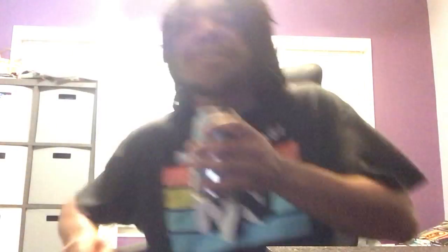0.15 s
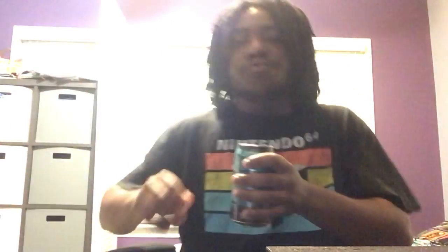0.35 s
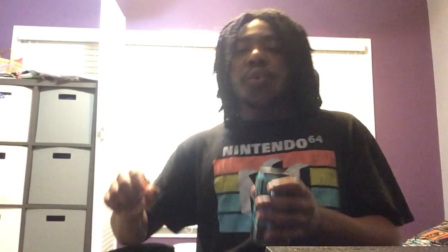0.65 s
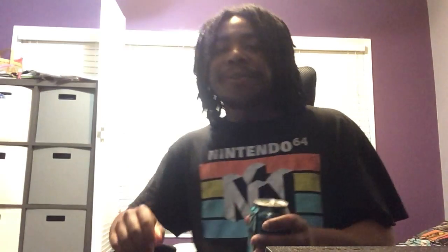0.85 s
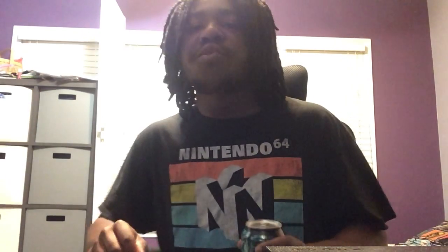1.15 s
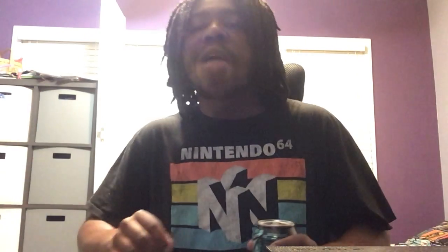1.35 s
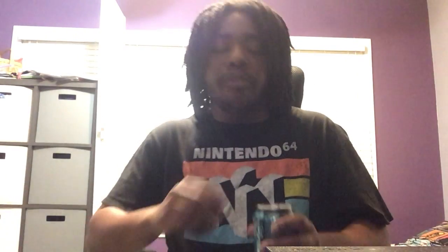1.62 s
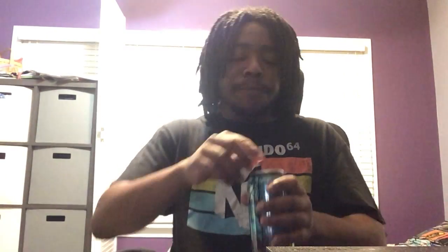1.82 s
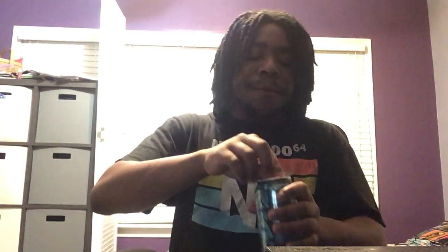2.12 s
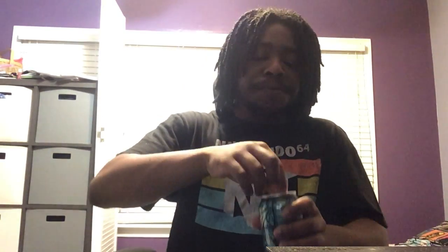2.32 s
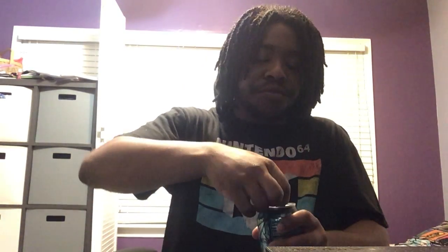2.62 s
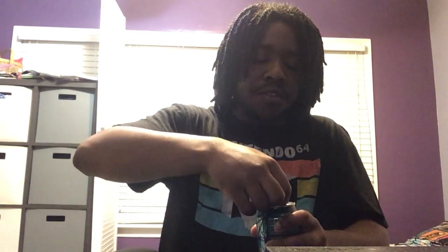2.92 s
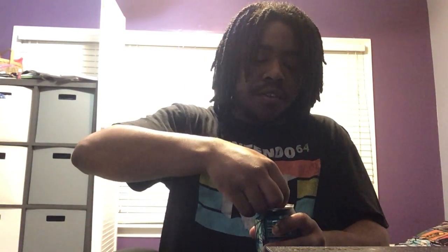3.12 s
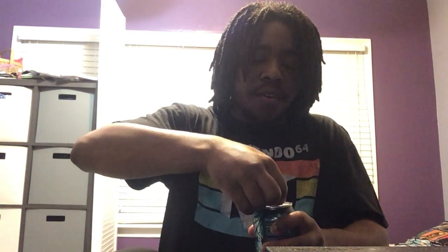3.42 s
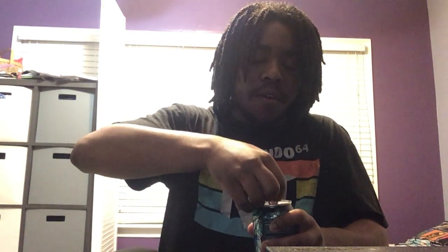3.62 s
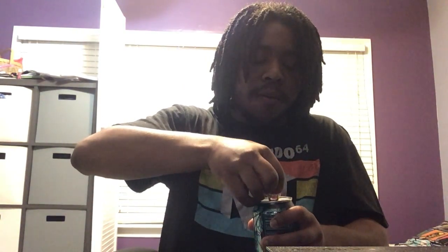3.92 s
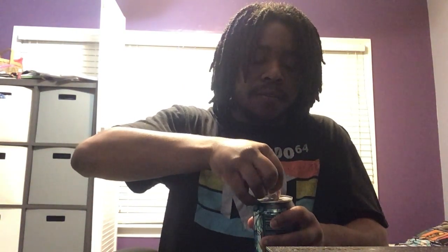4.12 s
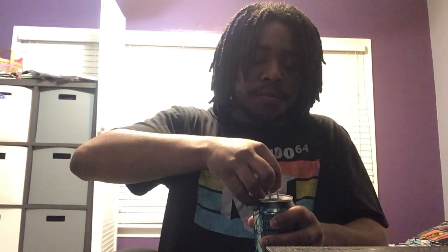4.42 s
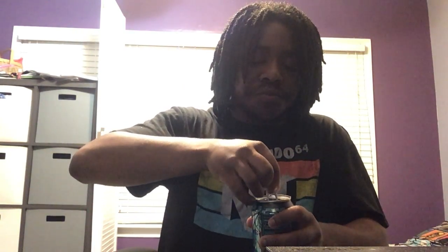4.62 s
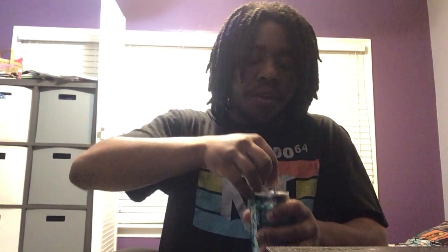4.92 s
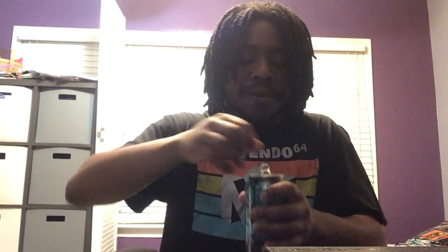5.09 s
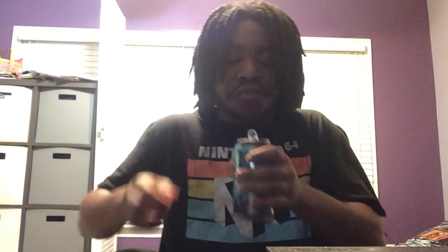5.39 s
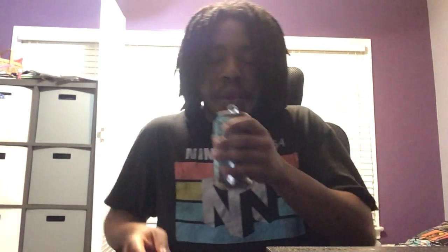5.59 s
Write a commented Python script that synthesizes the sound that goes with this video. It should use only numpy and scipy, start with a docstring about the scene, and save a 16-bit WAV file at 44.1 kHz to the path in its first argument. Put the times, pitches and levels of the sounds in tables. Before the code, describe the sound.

Soft chair thuds and finger ticks, a short gas hiss with metallic pops, then a loud can-tab crack in a small whirring room.

```python
"""A small room: someone sits down at a desk and slowly opens an aluminium drink can near a laptop microphone.
Soft bumps and finger ticks come first, made from struck bursts of coloured noise.
The seal cracks and a jet of coloured noise hisses out; the lid buckles in bright pops of ringing modes.
The score tears in ticks, then the flap snaps in with a crack, a rattling can and a pulse of air.
A fan of noise and wavering tones whirs throughout; the recorder's gain control ducks it after the snap."""
import sys
import numpy as np
from scipy import signal
from scipy.fft import rfft, irfft
from scipy.io import wavfile
from scipy.ndimage import uniform_filter1d, minimum_filter1d

SR = 44100
rng = np.random.default_rng(int(sys.argv[2]) if len(sys.argv) > 2 else 0)


def output_pcm(signal):
    """Save a mono or channel-first signal as 16-bit PCM at the path in sys.argv[1].

    Samples are clipped to [-1, 1] before scaling.
    """
    pcm = np.clip(np.atleast_2d(signal).T, -1, 1) * 32767
    wavfile.write(sys.argv[1], SR, np.round(pcm).astype(np.int16))


N = 253591
T = np.arange(N) / SR
RING = T[:8192]  # time axis of one hit or one filter

# fan air: f/Hz, level/dB
AIR_COLOUR = [(15, -58), (25, -26.5), (42, -8.5), (92, -5.5), (288, -6.5), (376, -0.5), (501, -2.5),
              (643, -5.5), (694, -6), (824, -13.5), (1120, -17.5), (1460, -9.5), (1800, -16), (1950, -15),
              (2400, -23), (3120, -43), (5280, -120)]
# microphone hiss: f/Hz, level/dB
HISS_COLOUR = [(1180, -31), (2000, -0.5), (2240, -15), (2590, -4), (4920, -13.5), (7510, -12.5),
               (7710, -10.5), (9990, -8.5), (14700, -11), (15800, -19.5)]
# fan tones and electrical whine: f/Hz, level/dB
FAN_TONES = [(712, -69.5), (1424, -67), (1663, -74), (1900, -71.5), (7962, -77), (9238, -81.5),
             (10150, -84.5)]
# how long the room rings: f/Hz, t60/s
ROOM_DECAY = [(150, 0.4), (600, 0.44), (1400, 0.19), (4500, 0.22), (14000, 0.2)]
# colour of the room's tail: f/Hz, level/dB
ROOM_COLOUR = [(100, -4), (600, -3.5), (1500, -2), (4000, -2), (8000, -2), (15000, -4.5)]
# colour of the bounce off the near wall: f/Hz, level/dB
BOUNCE_COLOUR = [(1000, -4), (5000, -6), (8000, 3), (11000, 5.0), (15000, 6.5)]
# soft bumps of body, chair and desk: t/s, level/dB, knock against thud/dB, time until the weight settles/s
BUMPS = [(0.07, -29.5, -4, .03), (0.238, -45.5, 3.5, 0.0099), (0.293, -42, -10, 0.0045),
         (0.799, -43.5, -21, .012), (0.924, -48, -14, 0.00386), (1.741, -34, -7.5, .014),
         (1.829, -45, -22, 0.0087)]
# colour of a padded thud: f/Hz, level/dB
THUD_COLOUR = [(50, -26), (100, -7), (165, 4), (340, 2.5), (600, -10.5), (1200, -23), (3000, -50)]
# colour of its wooden knock: f/Hz, level/dB
KNOCK_COLOUR = [(300, -13), (700, 2), (950, 0), (1250, 2.5), (1800, -5), (3000, -18.5), (9000, -29)]
# fingers tick on the can: t/s, peak level/dB, centre f/Hz
FINGER_TICKS = [(0.161, -45.5, 3770), (0.2368, -44, 3870), (0.5365, -47.5, 2610), (0.84, -41.5, 12800),
                (0.8834, -47.5, 2820), (1.2905, -45.5, 3760), (1.3078, -44, 3830), (1.3623, -41.5, 7700),
                (1.3799, -43, 2800), (2.1767, -47.5, 3010), (3.472, -48.5, 4580), (4.652, -43, 6300),
                (4.9157, -42.5, 13600), (5.658, -46.5, 4380)]
# the hands shift their grip, with fainter ticks: from t/s, to t/s
GRIP_SHIFTS = [(0.051, 0.3), (4.649, 5.7)]
# colour of the gas jet: f/Hz, level/dB
JET_COLOUR = [(1000, -35.5), (3300, -23.5), (4200, -7.5), (5700, -9), (6600, 1), (8000, -5), (9000, -0.5),
              (11300, -1), (12400, 3), (13500, -1.5), (15600, -5)]
# the lid buckles under the tab: t/s, level/dB, lid pitch f/Hz, upper modes/dB, crack/dB
LID_POPS = [(2.6484, -31, 4250, 3.5, 2), (2.8407, -19, 4050, -10, -4.5), (2.871, -15, 4350, 4.5, -2.5),
            (3.532, -20, 4440, -5.5, -3)]
# the lid's overtones: f/Hz, level/dB, t60/s
LID_MODES = [(4866, -3, 0.013), (5140, -3.5, 0.014), (5430, -2.5, 0.0078), (6440, -6.5, 0.0062),
             (8670, -10, 0.01), (9550, -8, 0.0085), (10570, -5.5, .011), (12400, -10, 0.014),
             (14100, -16, 0.0104)]
# the can's wall under the pops: f/Hz, level/dB, t60/s
WALL_MODES = [(377.7, -9, .015), (800, -5, .015), (1560, -1, 0.012), (1690, 2, .014), (2706, -5, 0.027),
              (2820, -4, .012), (3590, 3.5, 0.013)]
# the score tears a little further: t/s, level/dB
TEARS = [(3.745, -42.5), (3.8769, -49), (3.9455, -54), (4.0102, -30), (4.0587, -28), (4.091, -33)]
# tab and flap ring together: f/Hz, level/dB, t60/s
TAB_MODES = [(820, -18, 0.018), (2752.4, -22, 0.021), (3556, -17.5, 0.024), (3700, -12.5, 0.0235),
             (4650, 0.5, 0.012), (4900, 1.5, 0.0086), (5300, -2.5, 0.014), (6200, -6.5, 0.011),
             (7110, -9.5, 0.0113), (8900, -9, 0.033), (10850, -8, .01), (13700, -17, .008)]
# colour of tearing metal: f/Hz, level/dB
CRACK_COLOUR = [(200, -22.5), (1000, -15), (2200, -4.5), (4000, 1.5), (6500, 6), (8000, -1), (11500, 0.5),
                (14000, -0.5), (15500, -9)]
# the opened can rings: f/Hz, level/dB, t60/s
CAN_MODES = [(670, -8.5, 0.0089), (1223, -2, 0.0196), (2107, -2, .02), (2580, -4.5, 0.024),
             (2790, -6.5, 0.042), (3200, -7, .022), (3670, 3, 0.024), (3850, -2, .018), (4800, 5.5, 0.015),
             (6520, 1.5, .01), (6600, 0.5, .01), (11300, 3.5, 0.00795), (12100, -1, 0.0102)]
# the thin wall's countless close modes, as a colour: f/Hz, level/dB
SHEET_COLOUR = [(300, -13), (680, -6.5), (950, -16.5), (1250, -1), (1750, 3), (2100, 1.5), (3700, 0.5),
                (5200, -11), (7000, 1), (8200, -5.5), (11500, -3.5), (14000, -9), (15500, -19.5)]


def undb(db):
    """Decibels to gain."""
    return 10 ** (np.asarray(db) / 20)


def level(x, db=0):
    """Set the rms level."""
    return x * undb(db) / np.sqrt(np.mean(x ** 2))


def peak(x, db):
    """Set the peak level."""
    return x * undb(db) / np.abs(x).max()


def blow(x, db=0):
    """Give a hit the energy of 3 ms of sound at this level."""
    return x * undb(db) * np.sqrt(.003 * SR / np.sum(x ** 2))


def add(out, s, x):
    """Mix a sound in at time s."""
    i = int(s * SR)
    out[i:i + len(x)] += x[:N - i]


def along(points, hz):
    """Read (Hz, value) points on a log-frequency axis."""
    f, value = np.transpose(points)
    return np.interp(np.log(hz + 1), np.log(f), value)


def colour(x, points):
    """Filter to a (Hz, dB) shape; folding the cepstrum makes it minimum phase, so nothing sounds early."""
    hz = np.fft.rfftfreq(len(RING), 1 / SR)
    cepstrum = irfft(np.log(undb(along(points, hz))))
    cepstrum[1:len(RING) // 2] *= 2
    cepstrum[len(RING) // 2:] = 0
    impulse = irfft(np.exp(rfft(cepstrum)))
    return signal.fftconvolve(x, impulse)[:len(x)]


def band(x, hz, width):
    """One resonance, gain 1 at its centre."""
    return signal.lfilter(*signal.iirpeak(hz, hz / width, fs=SR), x)


def ramp(s, length_s):
    """Rise from 0 to 1, starting at time s."""
    return np.clip((T - s) / length_s, 0, 1)


def fade(t60, rise_s=0):
    """Exponential decay after an optional short swell."""
    swell = 1 - np.exp(-RING / rise_s) if rise_s else 1
    return swell * np.exp(-np.log(1000) * RING / t60)


def burst(t60, rise_s=0.000269):
    """A dying puff of noise."""
    return rng.standard_normal(len(RING)) * fade(t60, rise_s)


def ring(modes, scatter=0.00708, rise_s=0.00066):
    """Struck modes as dying sines, with pitch and phase never quite the same twice."""
    out = np.zeros(len(RING))
    for hz, db, t60 in modes:
        struck_hz = hz * (1 + scatter * rng.standard_normal())
        sine = np.sin(2 * np.pi * (struck_hz * RING + rng.random()))
        out += undb(db) * fade(t60, rise_s) * sine
    return out


def walk(rate):
    """Slow random wander with spread 1."""
    k = int(SR / rate)
    steps = np.repeat(rng.standard_normal(N // k + 2), k)
    return level(uniform_filter1d(steps, k))[:N]


def fan(air_db=-55, hiss_db=-65, swell_db=-0.33, wander_hz=2.51, flutter_db=0.5):
    """Moving air, wavering blade tones and the microphone's own hiss."""
    air = level(colour(rng.standard_normal(N), AIR_COLOUR), air_db) * undb(swell_db * walk(6))
    hiss = level(colour(rng.standard_normal(N), HISS_COLOUR), hiss_db)
    tones = np.zeros(N)
    for hz, db in FAN_TONES:
        phase = 2 * np.pi * np.cumsum(hz + wander_hz * walk(25)) / SR
        tones += level(np.sin(phase) * undb(flutter_db * walk(14)), db)
    return air + hiss + tones


def room(x, wall_s=.0077, wall_db=-7, desk_s=0.0021, desk_db=-11, tail_s=.0105, tail_db=-3.0):
    """Bounces off the desk and a near wall, then a short dense tail."""
    hz = np.fft.rfftfreq(len(RING), 1 / SR)
    noise = rfft(rng.standard_normal(len(RING)))
    centres = np.transpose(ROOM_DECAY)[0]
    tail = np.zeros(len(RING))
    # each band of the tail dies at its own rate
    for share, (_, t60) in zip(np.eye(len(ROOM_DECAY)), ROOM_DECAY):
        band_gain = along(np.c_[centres, share], hz)
        tail += irfft(noise * band_gain) * fade(t60)
    tail = colour(tail / np.sqrt(np.sum(tail ** 2)), ROOM_COLOUR)
    out = x.copy()
    add(out, desk_s, undb(desk_db) * x)
    add(out, wall_s, undb(wall_db) * colour(x, BOUNCE_COLOUR))
    add(out, tail_s, undb(tail_db) * signal.fftconvolve(x, tail)[:N])
    return out


def chair(hz=100, width_hz=55, rock_db=-24, rock_rise_s=.04, rock_t60_s=1.2):
    """Every bump rocks the chair: a low rumble from the seat swells and dies away."""
    rumble = band(band(rng.standard_normal(N), hz, width_hz), hz, 2 * width_hz)
    rocking = np.zeros(N)
    for s, db, _, _ in BUMPS:
        decay = np.exp(-np.log(1000) * np.abs(T - s) / rock_t60_s)
        rocking += undb(db + rock_db) * ramp(s, rock_rise_s) * decay
    return level(rumble) * rocking


def bumps(thud_t60=0.069, knock_t60=0.12, soften_db=-4, count=3):
    """Each padded bump lands in a few contacts that share its weight; the wooden knock softens each time."""
    out = np.zeros(N)
    for s, db, knock_db, settle_s in BUMPS:
        for k, lag in enumerate(np.linspace(0, settle_s, count)):
            thud = blow(colour(burst(thud_t60), THUD_COLOUR), db)
            knock = colour(burst(knock_t60, rise_s=0.00083), KNOCK_COLOUR)
            knock = blow(knock, db + knock_db + k * soften_db)
            add(out, s + lag, (thud + knock) / np.sqrt(count))
    return out


def handling(tick_t60=.018, tick_width=0.28, grip_hz=4000, grip_peak_db=-53, grip_spread_db=2.5, count=4):
    """Soft ticks of fingers on the can: a few clear ones, and faint ones at random while the grip shifts."""
    out = np.zeros(N)
    ticks = list(FINGER_TICKS)
    for start, end in GRIP_SHIFTS:
        for _ in range(count):
            db = grip_peak_db + grip_spread_db * rng.standard_normal()
            hz = grip_hz * 2 ** rng.uniform(-0.56, 0.66)
            ticks.append((rng.uniform(start, end), db, hz))
    for s, db, hz in ticks:
        tick = band(burst(tick_t60, rise_s=0.00094), hz, tick_width * hz)
        add(out, s, peak(tick, db))
    return out


def gas(slit_s=2.68, spring_s=.009, widen_s=0.072, ajar_share=.29, gas_db=-26, seep_db=-52.5,
        drain_db_per_s=62, vent_s=0.207, release_s=0.039, sputter_db=-1.1):
    """Gas seeps from the first pop, then jets, sputtering slightly: slit opening times the pressure left."""
    # the slit springs ajar, then widens
    opening = ajar_share * ramp(slit_s, spring_s) + (1 - ajar_share) * ramp(slit_s, widen_s) ** 2
    drained_s = np.maximum(T - slit_s - widen_s, 0)
    dying_away = 1 - ramp(slit_s + vent_s - release_s, release_s)
    pressure = undb(-drain_db_per_s * drained_s) * dying_away
    seep = undb(seep_db) * (T > LID_POPS[0][0])
    jet = level(colour(rng.standard_normal(N), JET_COLOUR))
    return jet * (seep + undb(gas_db) * opening) * pressure * undb(sputter_db * walk(300))


def lid(dome_t60=0.0091, crack_t60=0.014, wall_db=-14.0, split_hz=170):
    """The thin dome flips with a crack; being out of round it rings in a close pair, damped by the fingers."""
    out = np.zeros(N)
    for s, db, hz, upper_db, crack_db in LID_POPS:
        pair = [(hz - split_hz / 2, 0, dome_t60), (hz + split_hz / 2, 0, dome_t60)]
        dome = blow(ring(pair, rise_s=.001))
        upper = blow(ring(LID_MODES), upper_db)
        wall = blow(ring(WALL_MODES), wall_db)
        crack = blow(colour(burst(crack_t60, rise_s=.0007), CRACK_COLOUR), crack_db)
        add(out, s, blow(dome + upper + wall + crack, db))
    return out


def tearing(crack_db=-4, crack_t60=.006):
    """Each slip of the score line cracks and rings the tab."""
    out = np.zeros(N)
    for s, db in TEARS:
        tab = blow(ring(TAB_MODES, scatter=.009, rise_s=0.00037))
        crack = blow(colour(burst(crack_t60), CRACK_COLOUR), crack_db)
        add(out, s, blow(tab + crack, db))
    return out


def snap(snap_s=4.1415, snap_db=-6, second_lag_s=0.0024, second_db=-1, crack_t60=0.0097, can_db=-4,
         sheet_db=-3.5, sheet_t60=0.094, swell_db=-23, swell_s=0.0034):
    """A brief noise swells into the snap; the flap rips free on one side, then the other, and the can rings."""
    swell = (T < snap_s) * np.exp(-np.abs(T - snap_s) / swell_s)
    out = swell * level(colour(rng.standard_normal(N), CRACK_COLOUR), swell_db)
    # the second side follows a little weaker
    for s, db in [(snap_s, snap_db), (snap_s + second_lag_s, snap_db + second_db)]:
        crack = blow(colour(burst(crack_t60), CRACK_COLOUR))
        can = blow(ring(CAN_MODES), can_db)
        sheet = blow(colour(burst(sheet_t60, rise_s=0.0025), SHEET_COLOUR), sheet_db)
        add(out, s, blow(crack + can + sheet, db))
    return out


def flap(s=4.1441, width_s=0.000257, db=-6, lead_s=0.00065, push=0.69, pull=0.56, refill_s=0.0052, suction=0.68):
    """The flap plunges in: a short push of air, then a suction that refills more slowly."""
    pushed = push * np.exp(-.5 * ((T - s + lead_s) / width_s) ** 2)
    pulled = pull * np.exp(-.5 * ((T - s) / width_s) ** 2)
    refill = (T > s) * np.exp(-np.abs(T - s) / refill_s)
    return undb(db) * (pushed - pulled - suction * refill)


def scene():
    """Chair, can and fan at the desk; tearing ticks and bumps get less room; flap, chair and fan stay dry."""
    thuds = room(bumps(), tail_db=-6.0, wall_db=-10)
    ticks = room(tearing(), tail_db=-5.5, wall_db=-9)
    can = room(handling() + gas() + lid() + snap())
    return (fan() + chair() + thuds + can + ticks + flap())[None]


def record(dry, low_hz=56, order=5, top_hz=15750, limit_db=-12.5, hold_s=0.11, release_db_per_s=55):
    """A small microphone without deep bass or top treble; gain control dips at once, holds, then recovers."""
    x = signal.sosfilt(signal.butter(order, low_hz, "high", fs=SR, output="sos"), dry[0])
    power = np.abs(uniform_filter1d(x ** 2, size=132))  # 3 ms window
    over = np.maximum(10 * np.log10(power + 1e-12) - limit_db, 0)
    # hold the largest recent excess, then let it fall at a steady rate
    hold = int(hold_s * SR) // 2 * 2 + 1
    over = -minimum_filter1d(-over, hold, origin=hold // 2)
    dip_db = np.maximum.accumulate(over + release_db_per_s * T) - release_db_per_s * T
    top = signal.ellip(10, .2, 80, top_hz, fs=SR, output="sos")
    return signal.sosfilt(top, x * undb(-dip_db))[None]


dry = scene()
out = record(dry)
output_pcm(out)
```